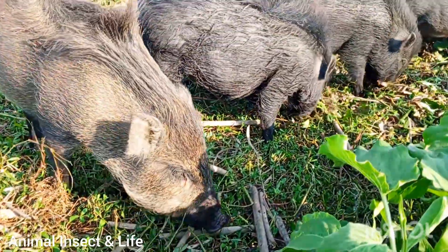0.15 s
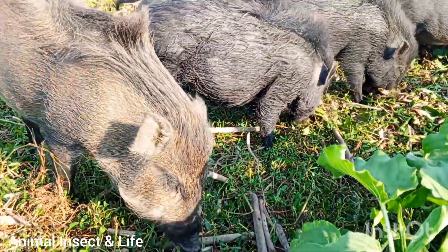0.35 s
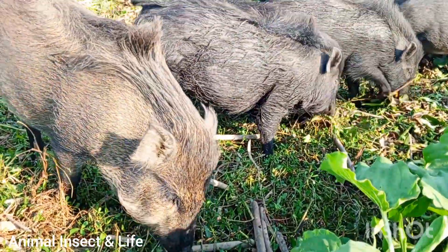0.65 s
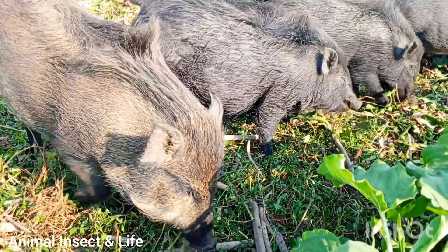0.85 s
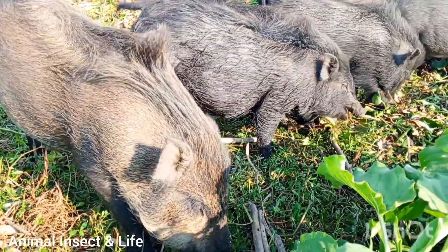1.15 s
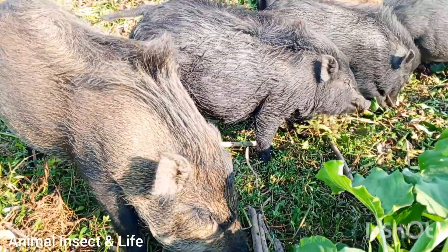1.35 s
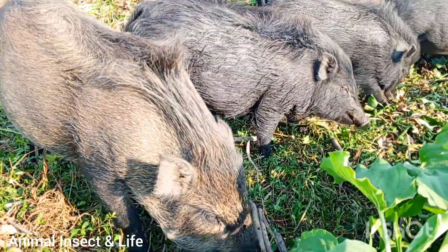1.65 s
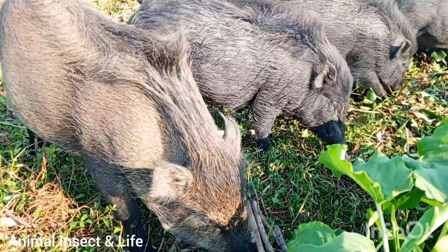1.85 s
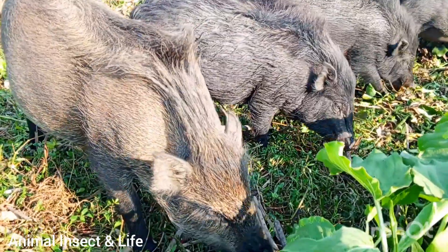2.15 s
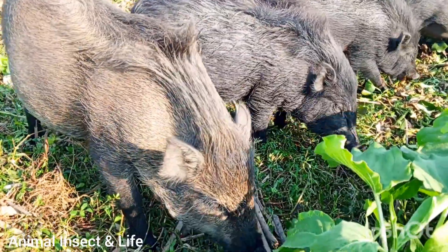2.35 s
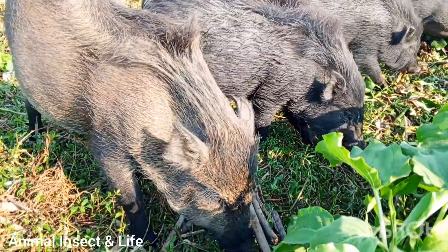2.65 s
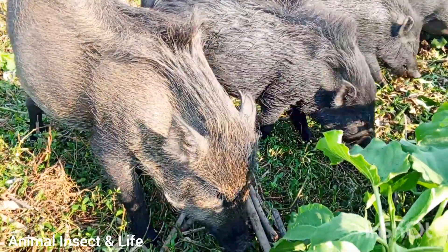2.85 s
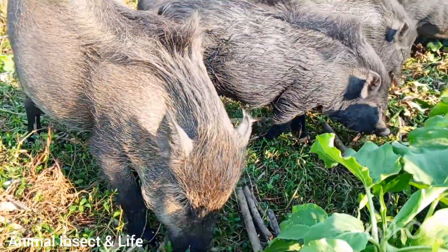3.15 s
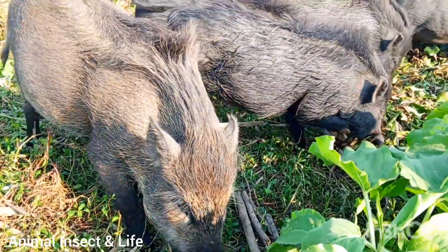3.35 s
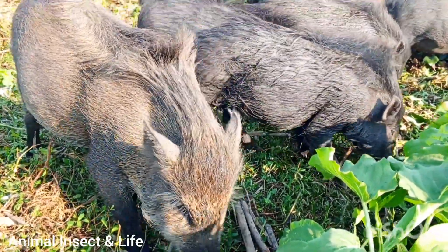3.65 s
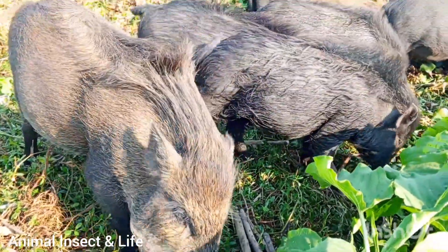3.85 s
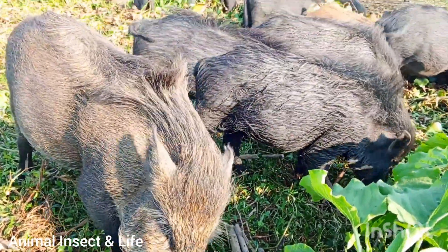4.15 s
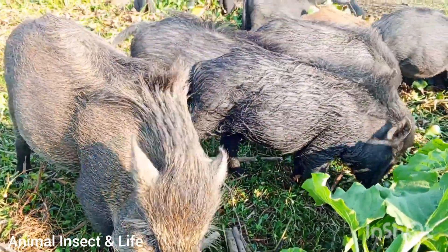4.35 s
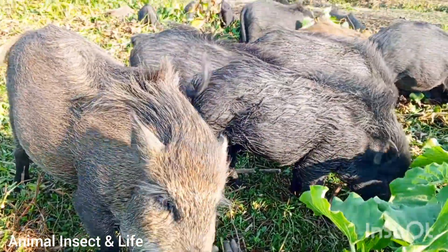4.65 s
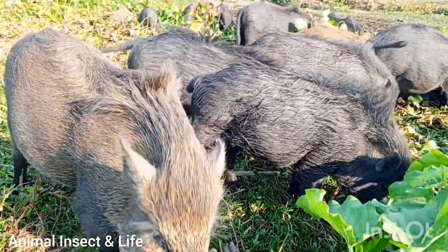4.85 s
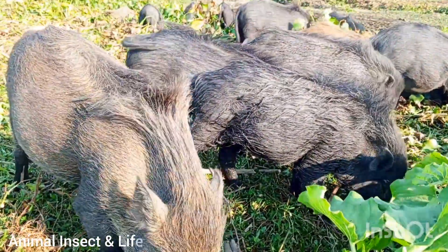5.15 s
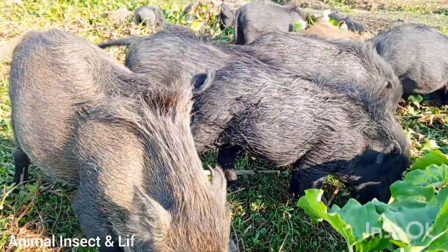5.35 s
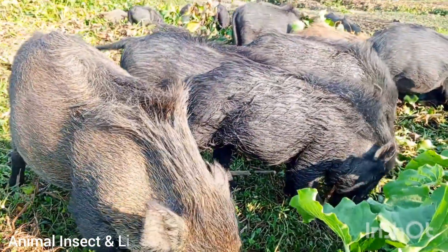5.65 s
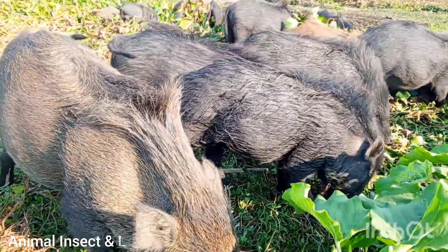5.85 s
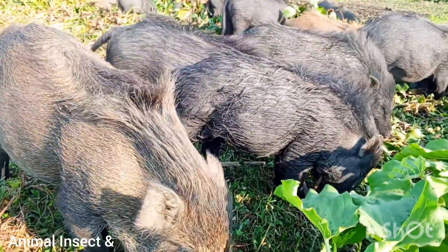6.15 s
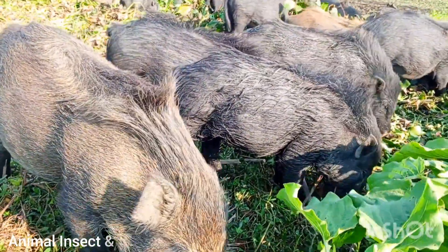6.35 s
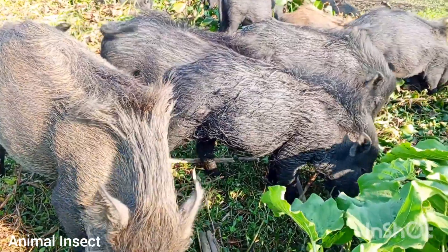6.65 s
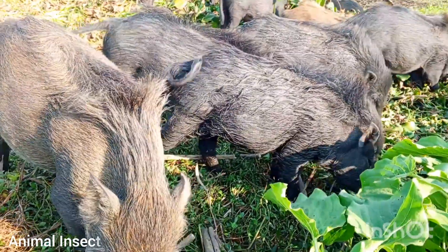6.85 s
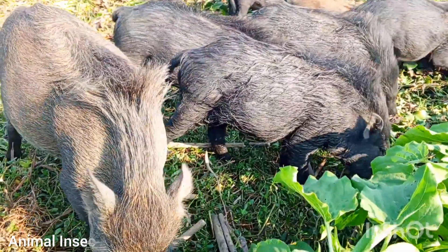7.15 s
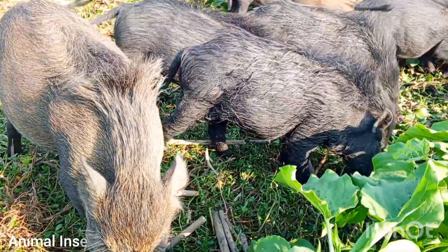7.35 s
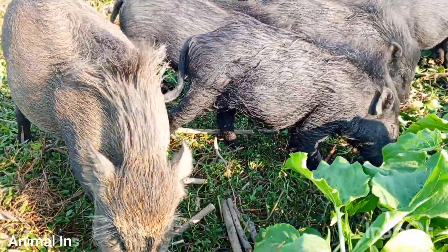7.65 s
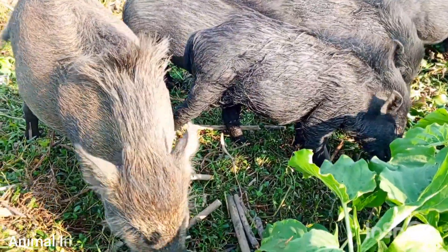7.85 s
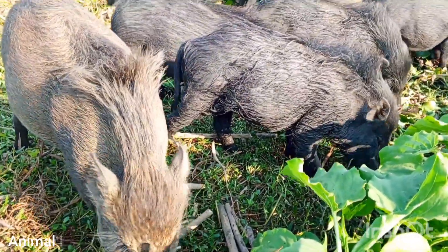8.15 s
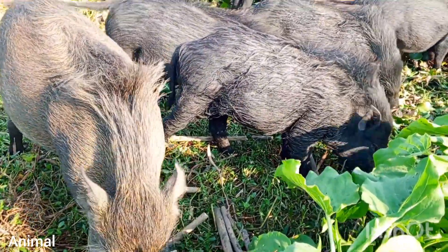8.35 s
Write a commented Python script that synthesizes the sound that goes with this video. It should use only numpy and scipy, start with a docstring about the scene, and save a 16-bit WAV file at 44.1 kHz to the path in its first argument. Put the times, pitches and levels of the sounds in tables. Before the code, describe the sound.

Pigs root and graze close by, with crackling litter, tearing grass, snaps and smacks, over a distant engine's low rapid thudding and dull handling bumps.

```python
"""Open grassland: piglets root and feed close to a hand-held phone. Random clicks, filtered, make the litter
rustle, blades tear and stalks snap; noise puffs ring nostrils, click runs ring two mouth resonances as smacks.
Far off a slow single-cylinder engine thuds thirteen times a second, each firing a push through two resonances,
with a thin metallic ring of narrow noise. Faint outdoor hiss is coloured noise; clusters of dull bumps on the
phone are short low swings."""
import sys
import numpy as np
from scipy import signal
from scipy.fft import rfft, irfft
from scipy.io import wavfile
from scipy.ndimage import uniform_filter1d

SR = 44100
rng = np.random.default_rng(int(sys.argv[2]) if len(sys.argv) > 2 else 0)


def wav_record(signal):
    """Record a signal, one row per channel, as 16-bit PCM in the file named by sys.argv[1]."""
    frames = np.transpose(np.atleast_2d(signal))
    bounded = np.clip(frames, -1, 1)
    # unit amplitude maps onto the largest positive 16-bit level
    quanta = np.round(bounded * 32767).astype(np.int16)
    wavfile.write(sys.argv[1], SR, quanta)


N = 374850
TIME = np.arange(N) / SR
TOP_HZ = 15700


def undb(db):
    """Decibels to gain."""
    return 10 ** (np.asarray(db) / 20)


def unit(x):
    """Scale to rms 1."""
    return x / np.sqrt(np.mean(x ** 2))


def curves(table):
    """Value columns of a time curve, interpolated sample by sample."""
    s, *columns = np.transpose(table)
    return [np.interp(TIME, s, c) for c in columns]


def add(track, start_s, sound):
    """Mix a sound into the track at start_s."""
    start = int(np.clip(start_s * SR, 0, N))
    track[start:start + len(sound)] += sound[:N - start]


def colour(x, points, size=2048):
    """Minimum-phase filter through (hz, db) points, built by folding the cepstrum."""
    hz, db = np.transpose(points)
    grid_hz = np.maximum(np.arange(size // 2 + 1) * SR / size, 1)
    gain = undb(np.interp(np.log(grid_hz), np.log(hz), db))
    cepstrum = irfft(np.log(gain))
    cepstrum[1:size // 2] *= 2
    cepstrum[size // 2 + 1:] = 0
    impulse = irfft(np.exp(rfft(cepstrum)))
    return signal.fftconvolve(x, impulse)[:len(x)]


def resonate(x, hz, width_hz):
    """One resonance, gain 1 at its centre."""
    return signal.lfilter(*signal.iirpeak(hz, hz / width_hz, fs=SR), x)


def resonate_twice(x, hz, width_hz):
    """Two equal resonances in series: steeper skirts."""
    return resonate(resonate(x, hz, width_hz), hz, width_hz)


def walk(rate_hz):
    """Random levels, about rate_hz a second, joined smoothly; rms 1."""
    levels = rng.standard_normal(N // 200)
    joined = np.interp(TIME * rate_hz, np.arange(len(levels)), levels)
    return unit(uniform_filter1d(joined, int(SR / rate_hz / 2)))


def crackle(count, spread_db, size):
    """Fibres that break at random moments within size samples: many small clicks, a few large."""
    when, chance, sign = rng.random((count, 3)).T
    strength = np.minimum(-np.log(1 - chance), 4)
    clicks = np.sign(sign - .5) * undb(spread_db * strength)
    return np.bincount((when * size).astype(int), clicks, size)


def fibres(spectrum, count, spread_db, own_db):
    """Crackle in 20 ringing bands, with partly shared clicks and wandering levels that shift the colour."""
    shared = crackle(count, spread_db, N)
    out = np.zeros(N)
    for hz in np.geomspace(400, 14000, num=20):
        clicks = shared / 2 + crackle(count, spread_db, N)
        out += resonate(clicks * undb(own_db * walk(50)), hz, hz / 10)
    return unit(colour(out, spectrum))


def effort(strokes, attack_share=0.47):
    """Amplitude of overlapping strokes (peak_s, length_s, level_db), each let go slightly slower than built up."""
    power = np.zeros(N)
    for s, length_s, db in strokes:
        near = slice(max(int((s - 2 * length_s) * SR), 0), int((s + 2 * length_s) * SR))
        u = (TIME[near] - s) / length_s
        side = np.where(u < 0, attack_share, 1 - attack_share)
        power[near] += undb(db) ** 2 * np.exp(-2 * (u / side) ** 2)
    return np.sqrt(power)


def air(level_db=-46, waver_db=2.23):
    """The hiss and rumble of open country: coloured noise, wavering slightly."""
    # spectrum: hz, level_db
    air_spectrum = [(20, -5.5), (50, -4.5), (90, 19.5), (160, 7.5), (280, 4.5), (600, -0.5), (1300, -0.5),
                    (2500, -6), (4000, -9.5), (8000, -14.5), (16000, -38.5)]
    return unit(colour(rng.standard_normal(N), air_spectrum)) * undb(level_db + waver_db * walk(10))


def rooting(restless_db=0.35, twig_db=-8, level_db=-1.0):
    """Snouts stir dry litter all the time and now and then shove through it, breaking fibres."""
    # litter spectrum: hz, level_db
    litter_spectrum = [(200, -23.5), (450, 5.5), (900, -2.5), (1400, 4), (1900, 8.5), (2700, 1.5),
                       (3500, -2), (5000, -12.5), (9000, -18.5)]
    # steady stirring as the snouts work nearer and farther: time_s, level_db
    stirring_curve = [(0.0, -52), (1.2, -49), (2.3, -50), (3.0, -49), (4.6, -49.5), (5.7, -48.5),
                      (6.3, -48.5), (7.2, -49), (8.5, -50.5)]
    # shoves through the litter: peak_s, length_s, level_db
    shoves = [(0.66, 0.023, -44.5), (0.855, 0.029, -37.5), (1.398, 0.028, -42.5), (2.678, 0.036, -41),
              (2.803, 0.033, -48), (3.53, .1, -39), (4.305, 0.077, -44.5), (5.975, 0.031, -41.5),
              (6.745, .05, -45)]
    stirring = undb(curves(stirring_curve)[0] + restless_db * walk(22))
    leaves = fibres(litter_spectrum, count=3500, spread_db=3.5, own_db=4.5)
    twigs = unit(colour(crackle(count=900, spread_db=4.0, size=N), litter_spectrum))
    return (leaves + undb(twig_db) * twigs) * np.hypot(stirring, effort(shoves)) * undb(level_db)


def tearing(grass_db=-53.5, restless_db=3.05, jerk_db=2.33, tick_db=-8, lull_db=-8, level_db=-1.5):
    """Teeth pull grass apart: tugs over steady grazing, a fine crackle of blades with separate stem ticks."""
    # blade spectrum: hz, level_db
    grass_spectrum = [(250, -27), (500, -5), (1000, -0.5), (2500, -1), (3700, 2), (6500, -2), (10000, -9.5),
                      (16000, -3)]
    # stem tick spectrum: hz, level_db
    tick_spectrum = [(500, -8), (3500, -3), (15000, -12)]
    # brief dips in the steady grazing: centre_s, length_s
    lull_times = [(0.285, 0.089), (0.623, 0.028), (3.11, 0.091), (4.01, .16)]
    # mouthfuls tugged loose: peak_s, length_s, level_db
    tugs = [(0.41, 0.072, -44), (0.88, 0.15, -50), (1.98, 0.38, -50), (2.68, 0.052, -48),
            (2.985, 0.12, -56), (3.52, 0.09, -50), (3.75, 0.051, -48), (3.89, 0.1, -44.5),
            (4.31, 0.25, -47), (4.61, 0.17, -45), (4.72, 0.05, -41), (4.893, 0.026, -41.5),
            (4.995, .05, -49), (5.45, 0.11, -47.5), (5.97, 0.05, -51), (6.22, 0.33, -58.5),
            (6.405, 0.085, -43.5), (6.57, 0.11, -42), (6.745, 0.089, -42), (6.82, 0.15, -44.5),
            (7.22, 0.051, -44), (7.505, 0.054, -47), (7.83, 0.043, -50), (8.14, 0.15, -50.5),
            (8.39, 0.12, -49.5)]
    lulls = effort([(s, length_s, 0) for s, length_s in lull_times])
    grazing = undb(grass_db + restless_db * walk(14) + lull_db * lulls)
    blades = fibres(grass_spectrum, count=5500, spread_db=3, own_db=3.5) * undb(jerk_db * walk(80))
    stems = unit(colour(crackle(count=1200, spread_db=6.0, size=N), tick_spectrum))
    return (blades + undb(tick_db) * stems) * np.hypot(grazing, effort(tugs)) * undb(level_db)


def engine(first_firing_s=.0123, pipe_hz=99, pipe_width_hz=58, top_hz=165, lead_s=0.0148,
           puff_s=0.0046, puff_db=-6, tail_s=0.069, tail_db=-17, level_db=-11.0):
    """Each firing is a push of gas with a turbulent puff; little but the exhaust's low boom carries this far."""
    # speed, wavering about the governor's setting: time_s, firing_rate_hz
    engine_speed = [(0, 12.995), (0.7, 13.001), (1.3, 13.304), (2.0, 12.759), (2.6, 13.058), (3.6, 12.963),
                    (4.8, 13.103), (5.6, 12.971), (6.3, 13.185), (8.5, 13.004)]
    # how well the sound carries: time_s, level_db
    engine_carry = [(0.0, -29.5), (0.5, -34), (0.9, -29), (1.3, -33.5), (2.1, -29.5), (3.6, -28),
                    (4.5, -30.5), (5.9, -29), (8.5, -31)]
    rate_hz, carry_db = curves(engine_speed)[0], curves(engine_carry)[0]
    turns = np.cumsum(rate_hz) / SR - first_firing_s * rate_hz[0]
    firings_s = np.interp(np.arange(int(turns[-1]) + 1), turns, TIME)
    t = TIME[:SR // 7]
    # the puff dies quickly; scattered echoes from the fields follow it
    decay = undb(puff_db) * np.exp(-t / puff_s) + undb(tail_db) * np.exp(-t / tail_s)
    decay /= np.sqrt(puff_s * SR / 2)
    distance = signal.butter(4, top_hz, fs=SR, output="sos")
    out = np.zeros(N)
    for s in firings_s:
        gas = rng.standard_normal(len(t)) * decay
        gas[0] += 1
        hz = pipe_hz * np.exp(0.0084 * rng.standard_normal())
        boom = signal.sosfilt(distance, resonate_twice(gas, hz, pipe_width_hz))
        jitter_s = 0.0016 * rng.standard_normal()
        add(out, s - lead_s + jitter_s, unit(boom))
    return out * undb(carry_db + level_db)


def engine_ring(ring_hz=765, width_hz=80):
    """A thin metallic ring of the engine: noise through a narrow resonance, its level drifting."""
    # level: time_s, level_db
    ring_level = [(0, -59), (2, -64), (2.9, -55.5), (4.5, -60), (6.5, -63)]
    ring = resonate_twice(rng.standard_normal(N), ring_hz, width_hz)
    return unit(ring) * undb(curves(ring_level)[0])


def snaps(first_db=5, splinter_s=0.02, splinter_db=-25, ring_q=6, broad_db=-15):
    """A stalk breaks within a few milliseconds and rings briefly, then its last fibres splinter."""
    # stalks: start_s, loudest_2ms_db, ring_hz, break_s, tilt_db_per_octave
    stalks = [(0.151, -38, 6600, .0006, 1), (0.3511, -40, 6000, 0.0022, 0), (0.3617, -34, 4370, 0.0046, 0),
              (0.8386, -33, 4170, .002, -3), (1.1816, -34, 4100, .0005, 2), (1.369, -38.5, 4100, .001, -6),
              (2.646, -37, 3450, .001, -3), (2.7537, -30, 3740, .001, -4),
              (3.4399, -32.5, 2670, 0.0024, -6), (3.733, -36, 3580, .002, 0.5),
              (3.839, -37, 8850, 0.0023, -3), (3.899, -32, 3700, 0.0034, 8),
              (3.9293, -36.5, 9100, .004, -3), (4.294, -33, 2600, .003, 0.5),
              (4.614, -37.5, 3880, 0.0035, -4), (4.7054, -24, 3800, 0.0011, -3),
              (4.8888, -46, 2670, .004, -5), (4.978, -44, 3530, .004, -6), (5.872, -37.5, 3380, 0.0044, -6),
              (6.5682, -34, 3800, .0015, -3.5), (6.6257, -37, 3800, .008, -5),
              (6.7034, -32, 2960, 0.0047, -0.5), (6.732, -31.5, 6540, 0.0044, -4),
              (7.713, -37, 3660, 0.0058, 3)]
    t = TIME[:SR // 12]
    out = np.zeros(N)
    for s, db, hz, break_s, tilt_db in stalks:
        decay = np.exp(-t / break_s) + undb(splinter_db) * np.exp(-t / splinter_s)
        clicks = crackle(count=1200, spread_db=2, size=len(t)) * decay
        clicks[0] += undb(first_db)
        broad = colour(clicks, [(edge, tilt_db * np.log2(edge / hz)) for edge in (600, TOP_HZ)])
        crack = resonate(clicks, hz, hz / ring_q) + undb(broad_db) * broad
        loudest = np.sqrt(uniform_filter1d(crack ** 2, size=SR // 500).max())
        add(out, s, undb(db) * crack / loudest)
    return out


def smacks(lower_width_hz=80, upper_width_hz=130, mouth_q=3.2, wet_db=-15, level_db=1):
    """Tongue and lips part with a run of wet clicks that ring two resonances of the mouth."""
    # partings: start_s, level_db, lower_hz, upper_hz, upper_re_lower_db, parting_s
    partings = [(0.2845, -23, 926, 1270, -4, .002), (.6715, -30, 1084, 1380, -2, .003),
                (2.798, -31, 770, 1700, 8, 0.0068), (3.4385, -23.5, 1040, 1610, 6, 0.0022),
                (3.351, -31.5, 1950, 2450, -2, .003), (3.4945, -27, 792, 1410, 7, .004),
                (3.524, -32, 920, 1450, -7, 0.0068), (3.897, -28, 770, 1290, 6, 0.0075),
                (4.2935, -30.5, 486, 815, 0, .003), (5.299, -22.5, 810, 1380, 3, 0.0038),
                (7.393, -33.5, 851.2, 1090, -4, 0.0042), (7.7928, -31, 780, 1327, 7, 0.0052)]
    t = TIME[:SR // 16]

    def ring(clicks, hz, width_hz):
        """A narrow and a broad resonance in series, scaled to peak 1."""
        rung = resonate(resonate(clicks, hz, width_hz), hz, hz / mouth_q)
        return rung / np.abs(rung).max()

    out = np.zeros(N)
    for s, db, lower_hz, upper_hz, upper_db, parting_s in partings:
        clicks = undb(wet_db) * rng.standard_normal(len(t)) * np.exp(-t / parting_s)
        clicks[0] += 1
        lower = ring(clicks, lower_hz, lower_width_hz)
        upper = ring(clicks, upper_hz, upper_width_hz)
        pop = lower + undb(upper_db) * upper
        add(out, s, undb(db + level_db) * pop / np.abs(pop).max())
    return out


def sniffs(sniff_s=0.042, edge_db=-4.0, scatter_db=2.55, nostril_q=2.4, flare=0.042, level_db=-1.5):
    """Quick puffs of air ring a piglet's nostrils, which flare differently each time; strongest in mid-bout."""
    # snuffling bouts: start_s, length_s, level_db, sniff_rate_hz, nostril_hz
    bouts = [(1.632, 0.5, -46.5, 15.3, 2380), (2.947, 0.12, -41.5, 18.2, 2630),
             (3.165, .42, -43.5, 17, 2130), (5.231, 0.78, -42.5, 17.6, 2120),
             (6.87, 0.572, -46, 15.8, 1895), (7.627, 0.18, -49, 15.5, 2450)]
    t = TIME[:SR // 8]
    puff = np.exp(-2 * (2 * (t - t.mean()) / sniff_s) ** 2)
    out = np.zeros(N)
    for start_s, length_s, db, rate_hz, nostril_hz in bouts:
        for delay_s in np.arange(0, length_s, 1 / rate_hz):
            hz = nostril_hz * np.exp(flare * rng.standard_normal())
            rush = unit(resonate_twice(rng.standard_normal(len(t)), hz, hz / nostril_q))
            arch_db = edge_db * (2 * delay_s / length_s - 1) ** 2
            sniff_db = db + level_db + arch_db + scatter_db * rng.standard_normal()
            add(out, start_s + delay_s - t.mean(), puff * rush * undb(sniff_db))
    return out


def bumps(cycles=0.55, sag=0.28, rub_hz=135, rub_width_hz=150, rub_rise_s=0.018, rub_s=0.035, rub_db=-24,
          knock_hz=330, knock_s=0.0015, knock_db=-28):
    """A soft contact swings the phone once, slowing as it relaxes, with a hollow knock and a rubbing shudder."""
    # contacts: centre_s, level_db, pitch_hz
    contacts = [(2.3297, -16, 124), (2.343, -21, 68), (2.355, -22, 147), (2.371, -23, 123),
                (6.452, -21, 135), (6.469, -7, 191), (6.485, -9.5, 187), (6.509, -19, 173),
                (6.545, -4, 146), (6.5554, -9, 86.5), (6.5752, -3.5, 141), (6.588, -12.5, 124),
                (6.7081, -14, 200), (6.7177, -6, 170), (6.744, -8.5, 152), (6.7567, -9, 144.4),
                (6.8223, -14, 98), (7.042, -6, 141), (7.059, -11.5, 122), (7.103, -10.5, 129)]
    t = np.arange(-SR // 25, SR // 8) / SR
    rubbing = np.exp(-np.maximum(t / rub_s, -t / rub_rise_s))
    knock = undb(knock_db) * np.cos(2 * np.pi * knock_hz * t) / np.cosh(2 * t / knock_s)
    soft = signal.butter(2, 2 * rub_hz, fs=SR, output="sos")
    out = np.zeros(N)
    for s, db, hz in contacts:
        turns = hz * t - sag * (np.hypot(hz * t, .5) - .5)
        swing = np.cos(2 * np.pi * turns) / np.cosh(turns * 2 / cycles)
        rub_noise = resonate_twice(rng.standard_normal(len(t)), rub_hz, rub_width_hz)
        shudder = undb(rub_db) * rubbing * unit(signal.sosfilt(soft, rub_noise))
        # quicker contacts knock harder
        add(out, s + t[0], undb(db) * (swing + shudder + knock * (hz / rub_hz) ** 2))
    return signal.sosfiltfilt(signal.butter(2, 52, "high", fs=SR, output="sos"), out)


def scene():
    """Everything as it reaches the phone."""
    animals = rooting() + tearing() + snaps() + smacks() + sniffs()
    return (air() + animals + engine() + engine_ring() + bumps())[None]


def record(dry):
    """The microphone port ripples the treble; the recorder cuts the deepest bass and the top."""
    # port response: hz, level_db
    port_response = [(2200, 0), (2520, 7.5), (2950, 2), (3900, 6), (4600, 0), (5300, -0.5), (6000, 5.5),
                     (6700, 4), (7900, -9.5), (9400, 2.5), (10700, 3), (12500, -12.5), (13800, -16),
                     (15000, -7.5)]
    low_cut = signal.butter(2, 32, "high", fs=SR, output="sos")
    top_cut = signal.ellip(10, .2, 80, TOP_HZ, fs=SR, output="sos")
    sound = signal.sosfilt(low_cut, colour(dry[0], port_response))
    return signal.sosfilt(top_cut, sound)[None]


dry = scene()
out = record(dry)
wav_record(out)
```